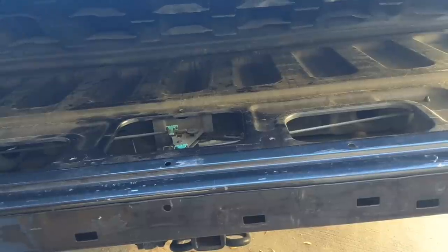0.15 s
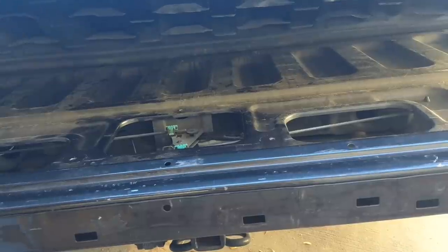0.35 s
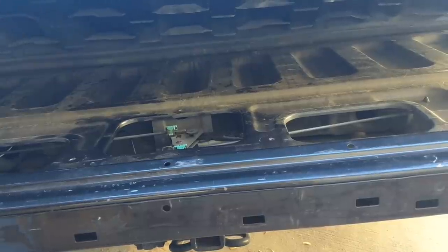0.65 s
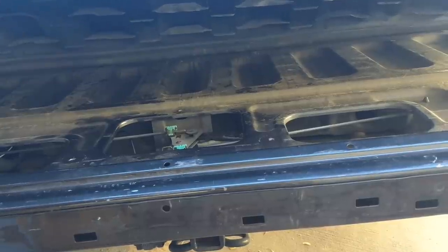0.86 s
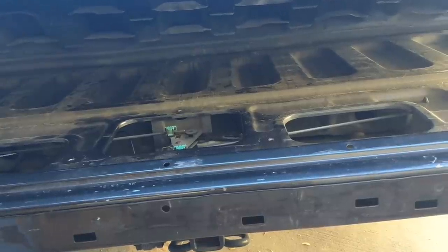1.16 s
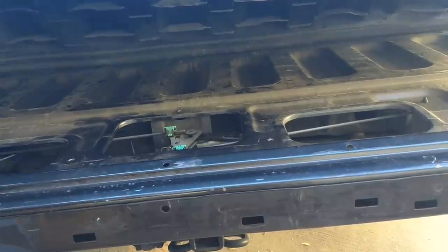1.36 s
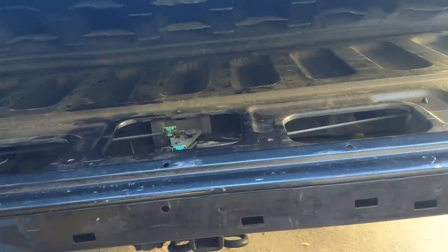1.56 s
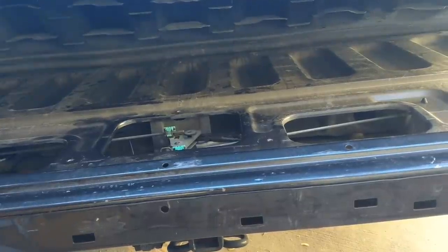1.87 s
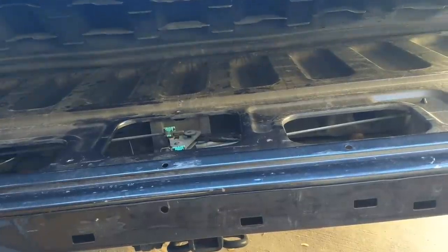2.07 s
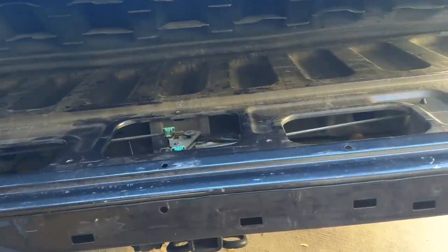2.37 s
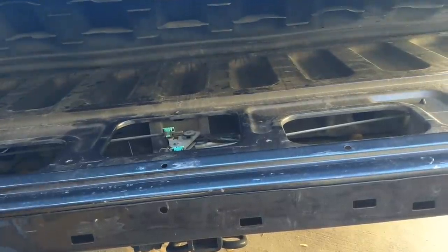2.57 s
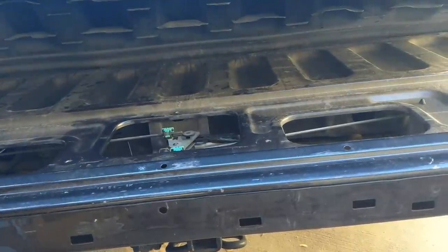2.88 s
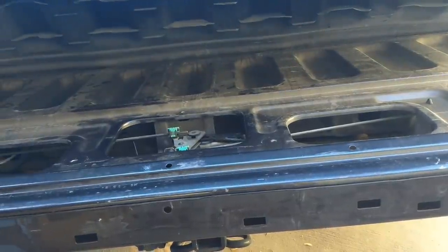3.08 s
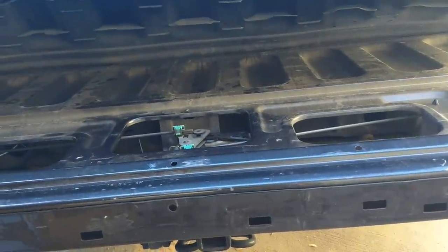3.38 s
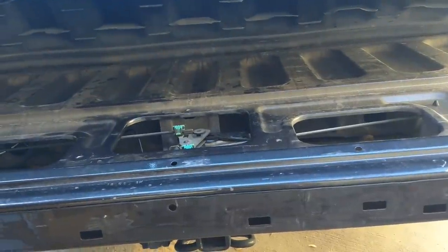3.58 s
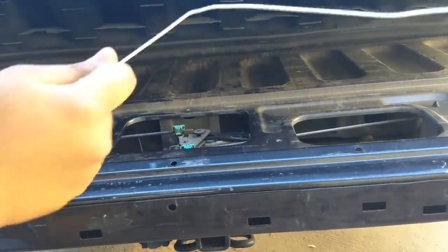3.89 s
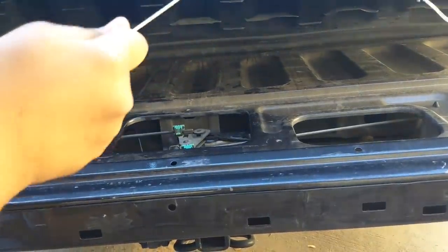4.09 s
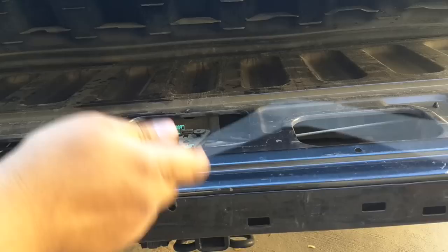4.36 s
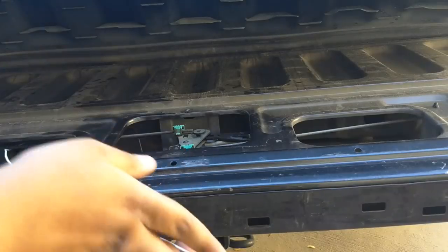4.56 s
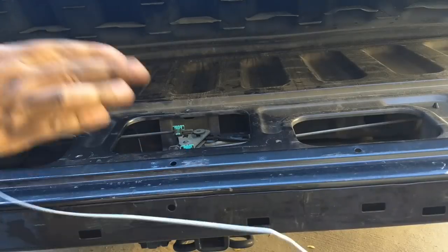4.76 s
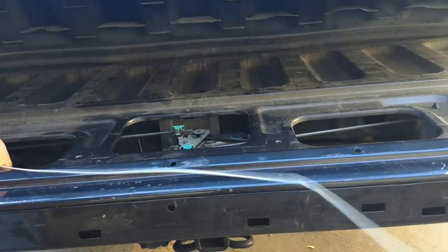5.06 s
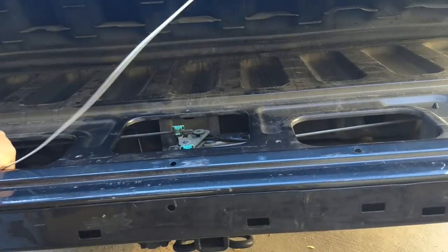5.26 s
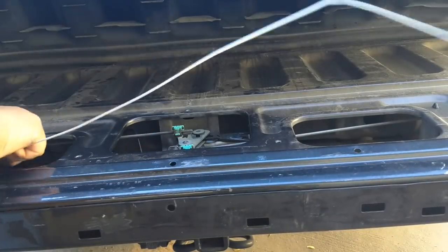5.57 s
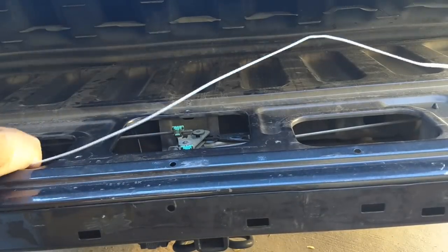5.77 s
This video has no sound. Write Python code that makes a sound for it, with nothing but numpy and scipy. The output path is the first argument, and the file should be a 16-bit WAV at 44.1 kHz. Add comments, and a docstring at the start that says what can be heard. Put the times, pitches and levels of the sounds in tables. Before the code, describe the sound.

Soft, low-weighted outdoor noise runs throughout, with a faint rub of stiff wire on steel. At 0.3 s a lone solid clank rings the hollow tailgate for a fraction of a second, followed by tiny touches. From about 1 to 2.8 s the wire is pushed along the panel openings: short gritty scrapes, hiss and dull rattle with boomy body, crowded by irregular hollow knocks and bright ticks, strongest around 2.3 to 2.7 s. At 3.1 s a piercing dry tick right by the microphone makes the whole sound drop, then gradually recover. Contacts stay sparse and faint until 4.4 s, when scrapes and knocks crowd again, up to 5.1 s. At 5.23 s a hard, bright metallic hit cracks and ducks the level once more. A few light taps follow, then two very short high wire squeaks with clicks near 5.9 s.

```python
"""Outdoor noise throughout, over it the faint rub of a stiff wire fed through openings of a steel tailgate.
A lone clank at 0.3 s; from 1 to 2.8 s pushes scrape and knock on the edges and the hollow panel rings.
A sharp tick by the microphone at 3.1 s ducks the gain control, which recovers at 20 dB/s; contacts are sparse.
From 4.4 s the knocks crowd again; a hard bright hit at 5.23 s ducks the gain; two squeaks of the wire near 5.9 s.
Noise-excited decays make the panel, random slips the scrape, decaying sines the squeaks and sharp peaks."""
import sys
import numpy as np
from scipy import signal
from scipy.fft import rfft, irfft, next_fast_len
from scipy.io import wavfile
from scipy.ndimage import uniform_filter1d, map_coordinates

SR = 44100
rng = np.random.default_rng(int(sys.argv[2]) if len(sys.argv) > 2 else 0)


def inscribe(sig):
    """Save sig as 16-bit PCM at rate SR to the path in sys.argv[1].

    A 1-D sig is mono; a 2-D sig holds one channel per row.
    Samples are clipped to [-1, 1] before scaling.
    """
    pcm = np.round(np.clip(np.atleast_2d(sig).T, -1, 1) * 32767)
    wavfile.write(sys.argv[1], SR, pcm.astype(np.int16))


N = 261513

# outdoor noise spectrum: f/Hz, relative density/dB
AIR_SPECTRUM = [(25, -21), (50, -11.5), (90, 0), (190, -3.5), (320, -7), (550, -3.5), (850, -3.5),
                (1400, -9.5), (2200, -18.5), (3200, -23.5), (5000, -29), (8000, -32), (15000, -44)]
# sharp peaks: a tick by the microphone, then the front of a hard bright hit:
# t/s, peak before ports and gain control/dB, t60 multiplier, mode tilt/(dB/octave)
SHARP_PEAKS = [(3.0943, 27, 1, -3.5), (5.2314, 9.5, 3.5, 11.5)]
# modes of the sharp peaks: f/Hz, level before tilt/dB, t60 before multiplier/s
SHARP_PEAK_MODES = [(1210, -5.5, 0.0042), (2980, 17.5, 0.00082), (4340, 7, 0.0033), (7740, 1.5, 0.0013),
                    (10670, 12, 0.0025), (13900, 6.5, 0.0014)]
# wire catches and squeaks: t/s, early rms level/dB, slip run length/s
SQUEAK_EVENTS = [(5.873, -15.5, 0.01), (5.913, -14, 0.015)]
# modes of the squeaking wire: f/Hz, relative level/dB, t60/s
WIRE_MODES = [(3140, -44, 0.092), (3680, -27, 0.1), (5400, -5, 0.15), (5400, 8, 0.067), (5755, -5, 0.13),
              (6197, 7.5, 0.095), (7220, 5.5, 0.063), (8400, -5, 0.083)]
# pushes along the panel edges: t/s, length/s, rattle level/dB, hiss level/dB, swell start to end/dB
PUSHES = [(0.21, 0.14, -44, -40.5, 13), (0.98, 0.19, -49.5, -51, 11.5), (1.193, 0.17, -39.5, -41, 0),
          (1.379, 0.31, -36, -32, 3), (1.726, .35, -38, -41, -2), (2.07, 0.23, -41, -53.5, -5.5),
          (2.278, 0.14, -33, -33, 0.5), (2.429, .24, -39.5, -32.5, -10.5),
          (2.767, 0.053, -33.5, -62.5, -1.5), (3.767, 0.23, -53.5, -62, -4), (4.555, .06, -37, -38, 4.5),
          (4.782, .2, -39, -41.5, -1), (4.993, 0.2, -36.5, -40.5, -4), (5.552, 0.052, -36, -42, -6),
          (5.756, 0.19, -51.5, -48.5, 13)]
# light chatter on the edge: start t/s, end t/s
CHATTER_SPANS = [(0.38, 0.56), (1.1, 2.1)]
# wire meets panel: t/s, knock level/dB, clash level/dB, drag time/s
CONTACT_EVENTS = [(0.008, -46, -38.5, 0.0025), (0.305, -14.5, -14, 0.0055), (0.661, -39.5, -33, 0.004),
                  (0.755, -45.5, -50.5, 0.0028), (0.907, -45.5, -41, 0.0026), (1.079, -51, -44, 0.0019),
                  (1.203, -36, -33, .0034), (1.244, -34.5, -42, .002), (1.415, -34.5, -28, 0.0069),
                  (1.49, -39, -30.5, .01), (1.545, -31, -28, 0.0062), (1.606, -39, -31.5, 0.0065),
                  (1.636, -31.5, -31, 0.0057), (1.715, -32.5, -21.5, 0.00089), (1.794, -32.5, -34, 0.0022),
                  (1.847, -33, -28, 0.0024), (1.931, -32.5, -32, 0.0035), (1.993, -42, -37, 0.0018),
                  (2.029, -30.5, -24.5, 0.0037), (2.265, -23.5, -25, 0.0035), (2.309, -32, -34.5, 0.0016),
                  (2.346, -33.5, -28.5, .005), (2.474, -25, -22, 0.0081), (2.52, -34, -30.5, .007),
                  (2.563, -40.5, -31, 0.0017), (2.684, -21.5, -20.5, 0.0017), (2.706, -34, -30.5, 0.008),
                  (2.9, -41.5, -41, .002), (3.292, -31, -46, .002), (3.774, -46.5, -40.5, 0.0011),
                  (4.176, -45, -66, .002), (4.273, -47.5, -39, .001), (4.357, -41.5, -32.5, 0.0043),
                  (4.459, -42, -56, .003), (4.585, -30, -29.5, 0.0065), (4.767, -34.5, -26.5, 0.007),
                  (4.793, -36.5, -25, 0.0065), (4.876, -28.5, -27, 0.0074), (4.97, -34, -29, 0.005),
                  (4.988, -31, -27, 0.0035), (5.04, -24.5, -29.5, 0.0027), (5.07, -35, -31, 0.0039),
                  (5.098, -33.5, -34, 0.0026), (5.2299, -20, -12, 0.00027), (5.503, -44.5, -43, 0.0051),
                  (5.543, -32.5, -28, 0.0013), (5.611, -37.5, -38, .0034), (5.812, -46, -51, .0015),
                  (5.874, -26.5, -17.5, 0.00083), (5.914, -34, -18, 0.0041)]
# scrape, cavity boom: f/Hz, relative density/dB
BOOM_SPECTRUM = [(20, -38), (35, -17), (60, -13.5), (95, 0), (140, -5.5), (190, 0.5), (240, -1), (310, -14),
                 (500, -46)]
# scrape, panel rattle: f/Hz, relative density/dB
RATTLE_SPECTRUM = [(150, -37), (300, -12), (450, 6), (620, 6), (800, 0), (1200, -3.5), (1750, -9.5),
                   (2200, -15), (3200, -37.5), (6000, -67)]
# scrape, hiss: f/Hz, relative density/dB
HISS_SPECTRUM = [(900, -30.5), (1900, -2.5), (2900, 0), (3900, 0), (5500, -1.5), (7800, -7), (10000, -16),
                 (15000, -26), (17000, -48)]
# contact, low thud: f/Hz, relative density/dB
THUD_SPECTRUM = [(50, -29.5), (120, -13.5), (190, 9.5), (260, -1.5), (380, -7.5), (700, -32.5)]
# contact, sheet bending under a blow: f/Hz, relative density/dB
FLEX_SPECTRUM = [(180, -29), (270, -4.5), (420, 0), (600, -2), (900, -22), (2000, -38.5)]
# contact, hollow knock: f/Hz, relative density/dB
KNOCK_SPECTRUM = [(100, -35), (250, -26.5), (350, -18.5), (500, -1), (850, 7), (1200, 1.5), (1700, -0.5),
                  (2200, 0.5), (3200, -11), (4500, -36.5), (7000, -55.5)]
# contact, steel clash before tilt: f/Hz, relative density/dB
CLASH_SPECTRUM = [(900, -46.5), (1900, -18), (2700, -4), (4000, -2.5), (5500, -0.5), (7500, 2), (10000, -7),
                  (13000, -11), (15500, -15), (17000, -30.5)]
# ringing of the hollow panel: f/Hz, t60/s
RING_T60 = [(150, 0.29), (800, 0.24), (2000, 0.22), (4000, 0.17), (8000, 0.076), (15000, 0.2)]
# tailgate resonances: f/Hz, width/Hz, lift (negative: dip)/dB
PANEL_RESONANCES = [(118, 4.8, 4), (168, 19, 3), (460, 7.7, 4), (689.4, 6.2, 3.5), (828, 80, 5.5),
                    (961, 13, 7.5), (1052, 25, 8), (1341, 33, 7), (1525, 74, 6), (2820, 16, -5),
                    (3430, 21, 2.5), (3560, 12, -0.5)]
# likeness of the two microphone ports: f/Hz, likeness/(0-1)
PORT_LIKENESS = [(30, 1), (100, 0.4), (300, 0.3), (800, 0.84), (2300, 1), (7000, 0.9), (15000, .8)]
# left port over right: f/Hz, level difference/dB
PORT_LEAN = [(100, 1.5), (500, 1.8), (1200, -1.3), (2400, -1.5), (4700, 0.6), (9000, 2.3)]

PUSH_ATTACK_S, PUSH_RELEASE_S = 0.023, 0.028  # the wire gets moving; it slows to 1/e
UNEVEN_DB, UNEVEN_PER_S = 1.5, 18  # hand pressure varies within a push
BOOM_DB, BOOM_EXPONENT = -15.5, 0.68  # boom follows the rattle gain, but swings less
IDLE_HISS_DB, IDLE_BOOM_DB = -65, -48  # the wire never lies quite still
CHATTER_PER_S, CHATTER_DB, CHATTER_SPREAD_DB = 12, -53, 2
HARD_KNOCK_DB, FLEX_DB, FLEX_DB_PER_DB = -13.5, -24, 2.33  # only hard blows bend the sheet much
BRIGHTEN_DB_PER_OCTAVE = 0.16  # for each dB of clash over knock: glancing contacts are brighter


def amp(db):
    """Decibels to gain."""
    return 10 ** (np.asarray(db) / 20)


def unit(x):
    """Scale to rms 1."""
    return x / np.sqrt(np.mean(x ** 2) + 1e-20)


def struck(x):
    """Scale a blow to rms 1 over its first 20 ms."""
    return x / np.sqrt(np.mean(x[:, :SR // 50] ** 2))


def along(points, hz):
    """Read (Hz, value) points on a log frequency axis."""
    f, v = np.transpose(points)
    return np.interp(np.log(hz + 1), np.log(f + 1), v)


def wobble(knots_per_s):
    """Smooth random curve through random knots."""
    knots = rng.standard_normal(int(N * knots_per_s / SR) + 4)
    return map_coordinates(knots, [np.arange(N) * knots_per_s / SR])


def filtered(x, response):
    """Apply a frequency response by FFT, zero-padded."""
    n = x.shape[-1]
    m = next_fast_len(n + SR // 20, real=True)
    return irfft(rfft(x, m) * response(np.fft.rfftfreq(m, 1 / SR)), m)[..., :n]


def coloured(x, spectrum, tilt_db_per_octave=0):
    """Shape x by a spectrum, tilted about 5 kHz; the tilt is constant below 2.5 kHz."""
    def response(hz):
        octaves = np.log2(np.maximum(hz, 2500) / 5000)
        return amp(along(spectrum, hz) + tilt_db_per_octave * octaves)
    return filtered(x, response)


def high_pass(x, edge_hz):
    """Second-order removal of the bass below edge_hz."""
    return signal.sosfilt(signal.butter(2, edge_hz, "high", fs=SR, output="sos"), x)


def patchy(z, patchy_db, frames):
    """Random strong and weak regions, two bins wide and some frames long, in a short-time spectrum."""
    field = uniform_filter1d(rng.standard_normal(z.shape[1:]), size=2, axis=0)
    field = uniform_filter1d(field, size=frames, axis=1)
    return z * amp(patchy_db * unit(field))


def add(track, start_s, sound):
    """Mix a sound in at start_s."""
    start = max(0, round(start_s * SR))
    part = track[..., start:start + sound.shape[-1]]
    part += sound[..., :part.shape[-1]]


def ringing(drag_s, patchy_db=4.0):
    """Dense panel modes, weighted anew per contact: build up during the drag, then die at RING_T60 rates."""
    hz, t, z = signal.stft(rng.standard_normal((2, SR // 4)), SR, nperseg=512)
    t60_s = along(RING_T60, hz)[:, None]
    fade = amp(-60 * np.maximum(t - drag_s, 0) / t60_s)
    tail = signal.istft(patchy(z, patchy_db, frames=20) * fade, SR, nperseg=512)[1]
    build_up = np.minimum(np.arange(tail.shape[-1]) / SR / max(drag_s, 1e-4), 1)
    return tail * build_up


def background(level_db=-47.0, drift_db=2.66, patchy_db=2):
    """Outdoor noise: shaped random noise whose level and colour wander a little."""
    z = signal.stft(rng.standard_normal((2, N)), nperseg=512)[2]
    air = signal.istft(patchy(z, patchy_db, frames=20), nperseg=512)[1][:, :N]
    level = amp(level_db + drift_db * wobble(3.8))
    return level * unit(coloured(air, AIR_SPECTRUM))


def sharp_peaks(echo_db=-19, tail_db=-55, edge_hz=600, echo_s=0.0035):
    """Brief decaying modes, thrown back once by the panel, with a faint ringing tail."""
    out, t = np.zeros((2, N)), np.arange(SR // 50) / SR
    for start_s, db, stretch, tilt in SHARP_PEAKS:
        modes = np.zeros(len(t))
        for hz, level_db, t60_s in SHARP_PEAK_MODES:
            decay_db = -60 * t / (t60_s * stretch)
            modes += amp(level_db + tilt * np.log2(hz) + decay_db) * np.sin(2 * np.pi * hz * t)
        peak = high_pass(modes, edge_hz)
        peak = peak / np.abs(peak).max()
        tail = struck(coloured(ringing(echo_s), CLASH_SPECTRUM, tilt_db_per_octave=-3.5))
        add(out[0], start_s, amp(db) * peak)
        add(out[0], start_s + echo_s, amp(db + echo_db) * peak)
        add(out, start_s, amp(db + tail_db) * tail)
    return out


def squeaks():
    """A short decaying run of random slips drives the wire's own modes."""
    out, t = np.zeros((2, N)), np.arange(SR // 6) / SR
    for start_s, db, length_s in SQUEAK_EVENTS:
        slips = rng.standard_normal((2, len(t))) * np.exp(-t / (length_s / 2))
        ring = np.zeros((2, len(t)))
        for hz, level_db, t60_s in WIRE_MODES:
            mode = np.sin(2 * np.pi * hz * t) * amp(-60 * t / t60_s)
            driven = signal.fftconvolve(slips, mode[None], axes=1)[:, :len(t)]
            ring += amp(level_db) * unit(driven)
        add(out, start_s, amp(db) * struck(ring))
    return out


def push_gains():
    """Rattle and hiss gains: each push sets in, swells or eases with uneven pressure and dies away."""
    t, power = np.arange(N) / SR, np.zeros((2, N))
    for start_s, length_s, rattle_db, hiss_db, swell_db in PUSHES:
        since = t - start_s
        attack = np.clip(since / PUSH_ATTACK_S, 0, 1)
        release = np.exp(-np.maximum(since - length_s, 0) / PUSH_RELEASE_S)
        swell = amp(swell_db * (np.clip(since / length_s, 0, 1) - 0.5))
        power += (amp([[rattle_db], [hiss_db]]) * attack * release * swell) ** 2
    return np.sqrt(power) * amp(UNEVEN_DB * wobble(UNEVEN_PER_S))


def scrape(crackle=0.82, slips_per_s=300, spread_db=4.5, patchy_db=3.6):
    """Irregular stick-slip impacts keep the panel ringing; its colour shifts as the contact point slides."""
    rattle_gain, hiss_gain = push_gains()
    happens = rng.random(N) < slips_per_s / SR
    strength = amp(spread_db * np.clip(rng.standard_normal(N), -2, 2))
    slips = happens * strength * rng.choice([-1, 1], N)
    panel = signal.fftconvolve(slips[None], ringing(0.00086, patchy_db=0), axes=1)[:, :N]
    roughness = rng.standard_normal((2, N))  # fine grain between the slips
    direct_slips = unit(slips) * [[1], [0]]
    z = signal.stft(unit(panel) + roughness + crackle * direct_slips, nperseg=512)[2]
    rub = signal.istft(patchy(z, patchy_db, frames=14), nperseg=512)[1][:, :N]
    boom_gain = np.hypot(amp(BOOM_DB) * rattle_gain ** BOOM_EXPONENT, amp(IDLE_BOOM_DB))
    rattle = rattle_gain * unit(coloured(rub, RATTLE_SPECTRUM))
    hiss = (hiss_gain + amp(IDLE_HISS_DB)) * unit(coloured(rub, HISS_SPECTRUM))
    boom = boom_gain * unit(coloured(roughness, BOOM_SPECTRUM))
    return rattle + hiss + boom


def chatter():
    """Light touches at random moments, as rows like those of CONTACT_EVENTS."""
    rows = []
    for start_s, end_s in CHATTER_SPANS:
        span_s = end_s - start_s
        for place, strength in rng.random((round(CHATTER_PER_S * span_s), 2)):
            db = CHATTER_DB + CHATTER_SPREAD_DB * (2 * strength - 1)
            rows.append((start_s + place * span_s, db, db, 0.001))
    return rows


def contacts(thud_db=-12, tilt_db_per_octave=-2.0, crack=0.45, crack_s=0.0011):
    """Each contact: low thud, hollow knock, bright clash with a crack at its front; hard ones bend the sheet."""
    out = np.zeros((2, N))
    for start_s, knock_db, clash_db, drag_s in CONTACT_EVENTS + chatter():
        ring = ringing(drag_s)
        t = np.arange(ring.shape[-1]) / SR
        cracked = ring * (1 + crack * np.exp(-t / crack_s))
        tilt = tilt_db_per_octave + BRIGHTEN_DB_PER_OCTAVE * (clash_db - knock_db)
        flex_db = FLEX_DB + FLEX_DB_PER_DB * (knock_db - HARD_KNOCK_DB)
        add(out, start_s, amp(knock_db + thud_db) * struck(coloured(ring, THUD_SPECTRUM)))
        add(out, start_s, amp(flex_db) * struck(coloured(ring, FLEX_SPECTRUM)))
        add(out, start_s, amp(knock_db) * struck(coloured(ring, KNOCK_SPECTRUM)))
        add(out, start_s, amp(clash_db) * struck(coloured(cracked, CLASH_SPECTRUM, tilt)))
    return out


def tailgate(x, loss_db=-2, cavity_t60_s=0.13, echo_gain=0.36):
    """Echoes inside the hollow door comb mids and treble finely; panel resonances lift or dip narrow bands."""
    t = np.arange(SR // 10) / SR
    echoes = high_pass(rng.standard_normal((2, len(t))), 1300) * amp(-60 * t / cavity_t60_s)
    echoes = echoes / np.linalg.norm(echoes[0])
    x = x + echo_gain * signal.fftconvolve(x, echoes, axes=1)[:, :N]

    def response(f):
        total = 1
        for centre, width, lift_db in PANEL_RESONANCES:
            band = 1j * f * width
            total = total + (amp(lift_db) - 1) * band / (centre ** 2 - f ** 2 + band)
        return total
    return amp(loss_db) * filtered(x, response)


def ports(x, delay_s=0.000428):
    """Direct and diffuse sound to left and right; in the treble the left port leads, with opposite sign."""
    def turn(hz):
        return np.arccos(np.clip(along(PORT_LIKENESS, hz), 0, 1)) / 2

    def late_phase(hz):
        return np.exp(-1j * np.maximum(2 * np.pi * hz * delay_s - np.pi, 0))

    def lean(hz):
        return amp(np.array([[0.5], [-0.5]]) * along(PORT_LEAN, hz))

    direct = filtered(x[0], lambda hz: np.cos(turn(hz)))
    late = filtered(direct, late_phase)
    diffuse = filtered(x[1], lambda hz: np.sin(turn(hz)))
    return filtered(np.array([direct + diffuse, late - diffuse]), lean)


def scene():
    """Background, sharp peaks, wire and tailgate at the two ports."""
    wire_on_panel = tailgate(scrape() + contacts())
    return ports(background() + sharp_peaks() + squeaks() + wire_on_panel)


def gain_control(x, threshold_db=-16.5, recovery_db_per_s=20, sense_hz=3800):
    """Loud treble peaks pull the gain down at once; it returns at a constant rate in dB."""
    treble_power = np.mean(high_pass(x, sense_hz) ** 2, axis=0)
    power = np.abs(uniform_filter1d(treble_power, SR // 500))  # 2 ms mean
    over_db = np.maximum(10 * np.log10(power + 1e-12) - threshold_db, 0)
    ramp_db = recovery_db_per_s * np.arange(N) / SR
    return x * amp(ramp_db - np.maximum.accumulate(over_db + ramp_db))


def record(dry, self_noise_db=-73, bass_edge_hz=32, top_hz=15900):
    """Gain control, faint self-noise, full-scale clipping and band limits."""
    self_noise = amp(self_noise_db) * rng.standard_normal((2, N))
    clipped = np.clip(gain_control(dry) + self_noise, -1, 1)
    return filtered(high_pass(clipped, bass_edge_hz), lambda hz: 1 / (1 + (hz / top_hz) ** 80))


dry = scene()
out = record(dry)
inscribe(out)
```